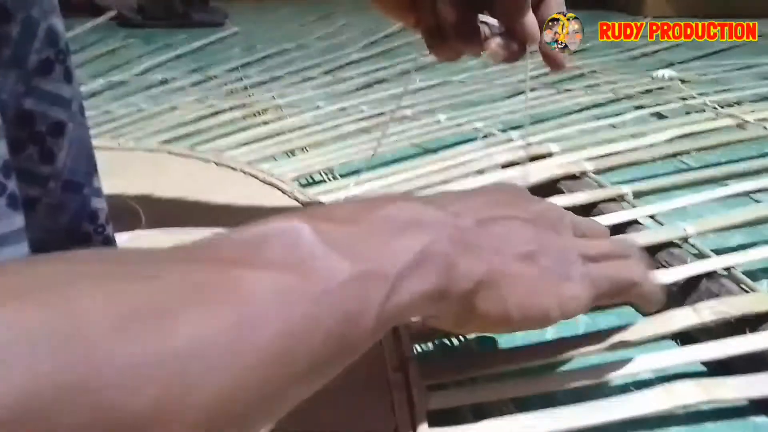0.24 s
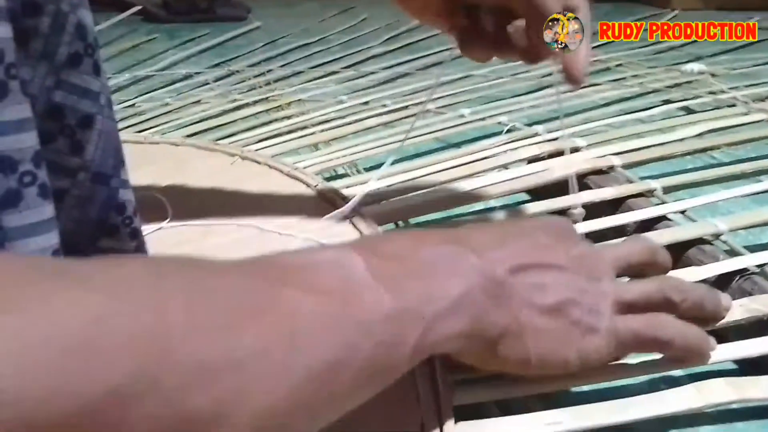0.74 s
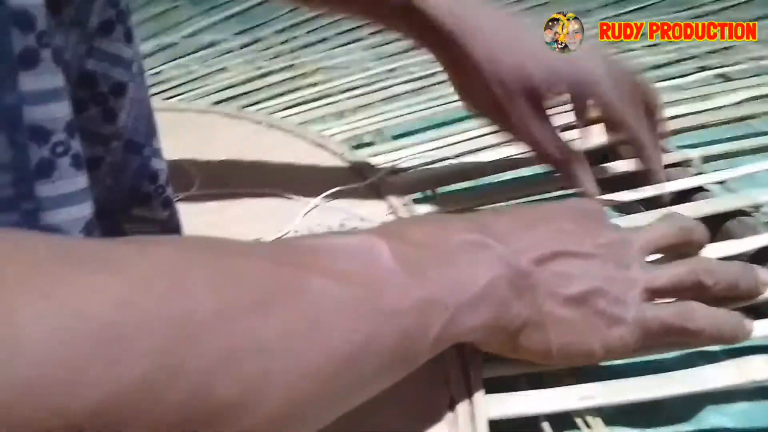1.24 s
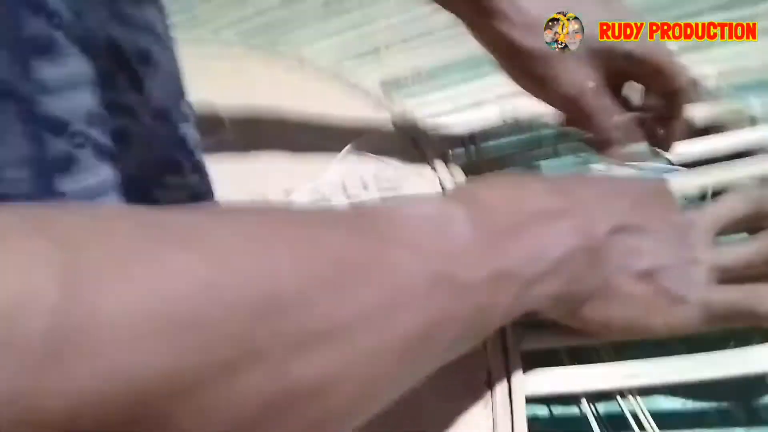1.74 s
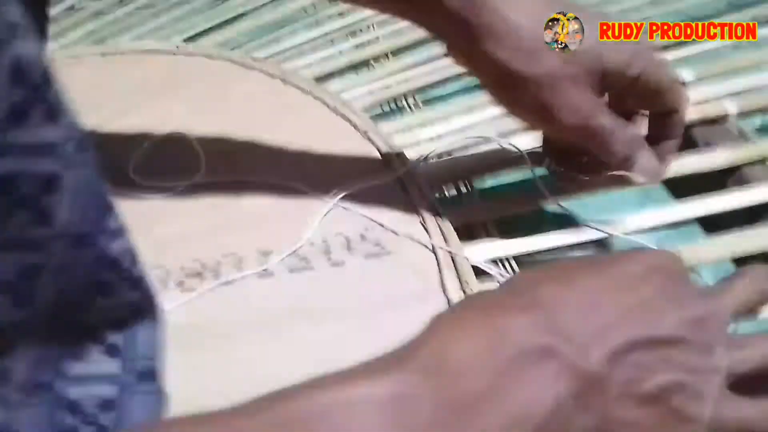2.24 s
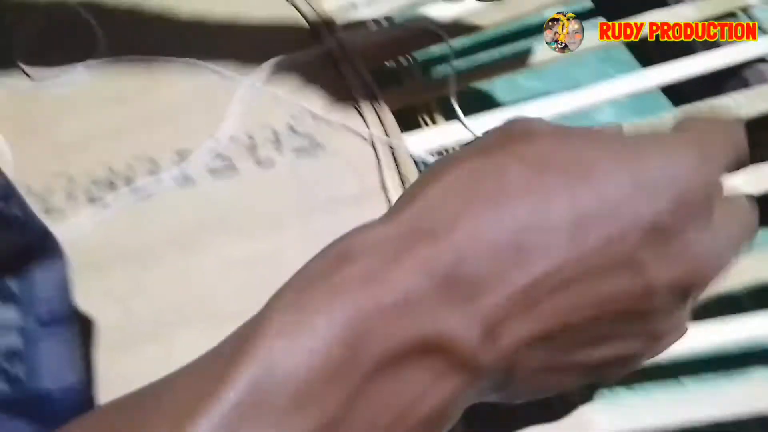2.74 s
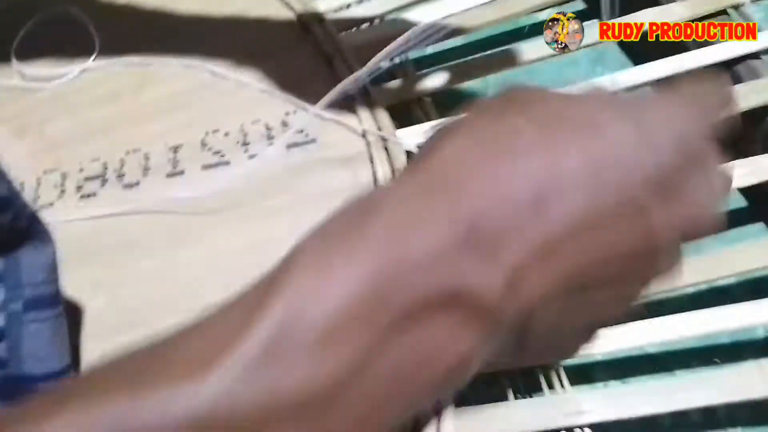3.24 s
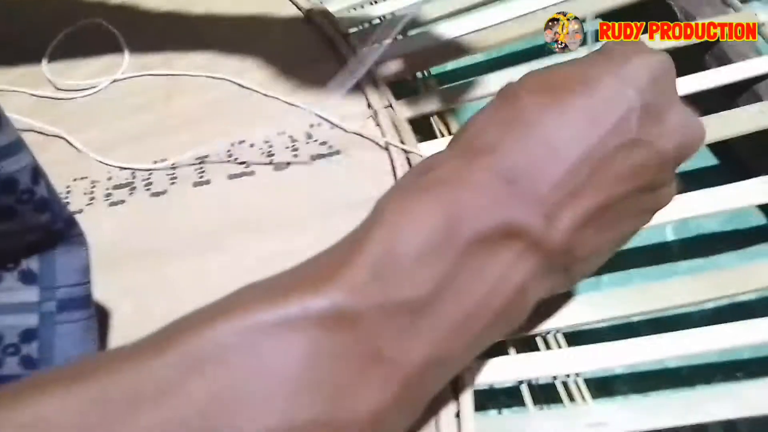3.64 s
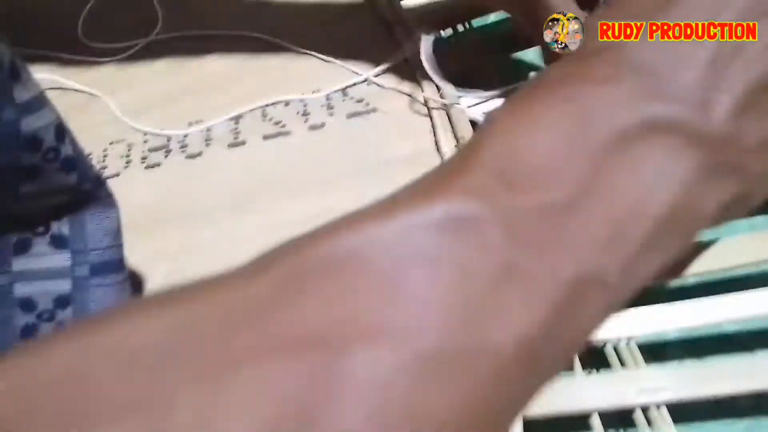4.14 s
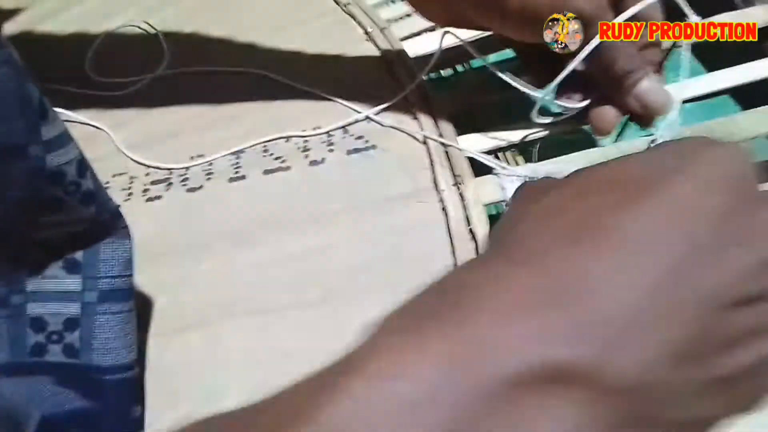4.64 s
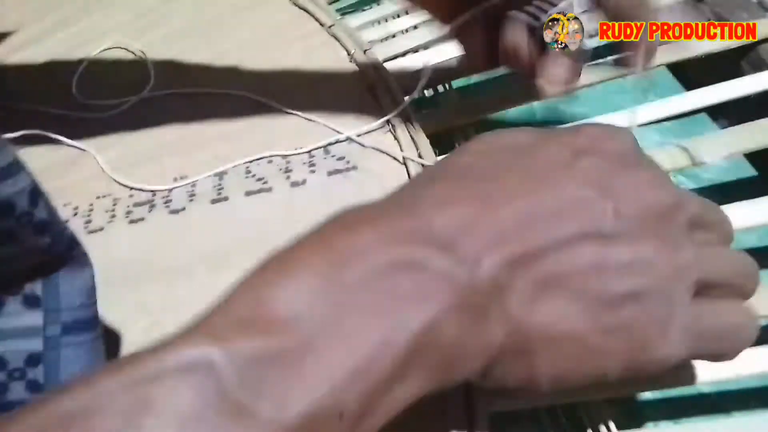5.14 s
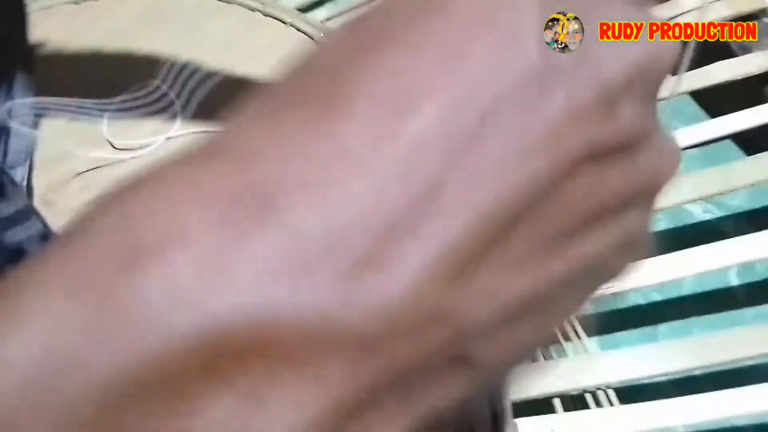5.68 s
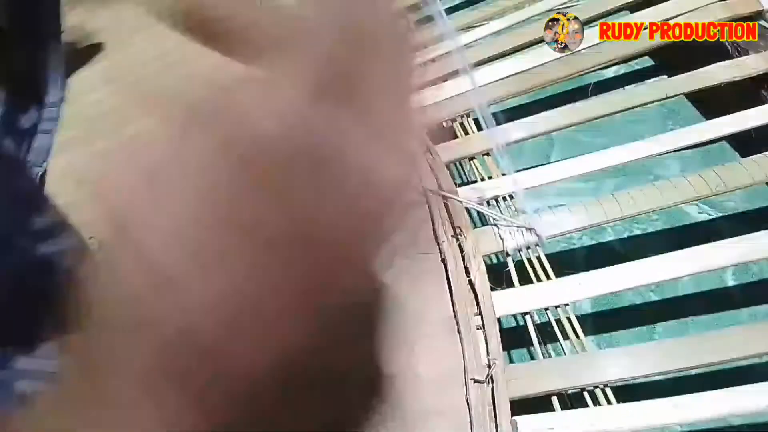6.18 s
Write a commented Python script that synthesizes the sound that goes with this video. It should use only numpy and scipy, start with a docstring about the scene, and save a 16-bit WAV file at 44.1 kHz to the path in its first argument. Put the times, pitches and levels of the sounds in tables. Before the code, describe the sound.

Close-up handling of thin bamboo slats being tied: quiet rubbing first, then a hard clack with rattle, a low string pull, a double knock, and a strong squeaky scrape around three seconds. Irregular woody knocks continue, each shaking the mat, becoming softer and hollower until only faint fibre rustle remains. Dry, small surroundings with short reflections and almost no background noise.

```python
"""First a soft scrape and a rustle are heard, then knocks, as bamboo slats are tied to a wooden frame with string.
Knocked slats ring as sums of decaying modes; scrapes are runs of random slips that excite the same modes.
Jolts set the mat of loose slats shivering: dense random contacts filtered by broad resonances.
String drags and squeaks by stick-slip, the hands rumble on the frame, a small piece of metal pings.
Short reflections follow the slats, over faint air; the level dips briefly three times."""
import sys
import numpy as np
from scipy import signal
from scipy.fft import rfft, irfft
from scipy.io import wavfile
from scipy.ndimage import uniform_filter1d

SR = 44100
rng = np.random.default_rng(int(sys.argv[2]) if len(sys.argv) > 2 else 0)


def unload_audio(sound):
    """Save the sound as a 16-bit wav file, at the path given as the first command line argument."""
    columns = np.transpose(np.atleast_2d(sound))
    # keep every value between -1 and 1, then stretch to whole-number steps
    steps = np.round(np.clip(columns, -1, 1) * 32767)
    wavfile.write(sys.argv[1], SR, steps.astype(np.int16))


N = 282681
T = np.arange(N) / SR  # time [s]

# Slat on slat: (time [s], level before voicing [dB], brightness [dB/octave], hollowness [dB], ring length factor)
KNOCKS = [(0.621, -74, -14, -4, .4), (0.671, -52.5, -3, -10.5, 0.12), (0.808, -67, -2.6, 5.5, 1.1),
          (1.2435, -52, -10, 5, 0.65), (1.3762, -65.5, 3.8, 6, 0.13), (1.4735, -32, -2.5, -17, 1.1),
          (2.164, -39.5, -5, -11, 0.61), (2.4433, -30.5, -6.5, -3.5, 0.77), (2.455, -46, -2.5, 11.5, 1.3),
          (2.5131, -29, -7, 4.5, 0.27), (2.822, -60.5, -18, 6, 0.11), (3.033, -50, -4.5, 1.5, 1.2),
          (3.411, -37, 5, 1.5, .55), (3.4624, -31, -0.5, 7, 0.4), (3.582, -34, -6, -22, 0.95),
          (3.6443, -49, -3, 17, 0.2), (3.932, -48, -10, -1, 1.9), (3.9731, -26, -7, -2.5, 1.04),
          (4.317, -48, -10, -8, 0.66), (4.372, -48.5, -11, 10, 0.96), (4.4932, -42, -18, 15, 0.57),
          (4.544, -26.5, -8, 6.5, 0.79), (4.7953, -45.5, -11, -20, 1.15), (5.019, -48, -9, 8.5, 1.6),
          (5.073, -38.5, -9, 11.5, 1.57), (5.229, -41.5, -16, 17.5, 1.9), (5.285, -44.5, -11.5, 8.5, .6),
          (5.444, -38, -10, 2, 0.74), (5.8755, -81, 3, -8, .3), (6.028, -69, -2.5, 11, 1.36)]
# Slat sliding on slat: (peak time [s], rise constant [s], fall constant [s], level before voicing [dB],
# brightness [dB/octave], hollowness [dB])
SCRAPES = [(0.04, 0.063, 0.048, -40.5, -10, 9.5), (0.11, 0.075, 0.034, -46.5, -15, 10.5),
           (0.63, 0.046, .03, -51, -8.5, -8.5), (2.44, 0.029, 0.033, -39.5, -5, -1),
           (3.05, 0.0018, 0.17, -44.5, -6, 1), (3.128, 0.023, 0.023, -41, -6.5, 10.5),
           (3.166, 0.0027, .029, -25.5, -6.5, 15), (3.22, 0.021, .048, -46, 2, 8.5),
           (4.38, .014, 0.031, -52, -14, 12), (4.765, 0.013, 0.015, -56, -4.5, 18),
           (4.936, 0.018, 0.011, -65.5, -5, 14), (5.235, 0.013, 0.033, -38, -13, 7),
           (5.27, .018, 0.021, -43, -6.5, -4.5), (6.08, .025, 0.049, -68, -0.5, -0.5),
           (6.171, .012, 0.021, -59, -1.5, -5), (6.295, 0.025, 0.011, -58, -2, -2)]
# Modes of a bamboo slat, before scatter and ring factor: (frequency [Hz], relative level [dB], t60 [s])
SLAT_MODES = [(345.6, -21.5, 0.017), (516.4, 4.5, 0.037), (552.9, 13, 0.15), (585.7, 4, 0.03),
              (722.6, 6.5, 0.065), (929, -7, 0.021), (1006.4, 6.5, 0.11), (1100, 21.5, 0.044),
              (1207, 3, 0.053), (1385, -14, 0.01), (1732, 2, 0.073), (1814, 1.5, 0.082), (1980, 8.5, 0.025),
              (2312, 5, 0.041), (2308, -8.5, 0.014), (2580, -4.5, 0.012), (3740, -17, 0.02),
              (4047, 0.5, 0.015), (4160, -1.5, 0.02), (4470, -5, 0.016), (5480, -8.5, 0.022)]
# Registers of a slat, low to high: (lower edge [Hz], upper edge [Hz])
REGISTERS = [(390, 800), (820, 1330), (1600, 2900), (3500, 5300)]
# How a contact shares its strength among the registers, low to high:
# (height above the lowest [octaves], relative level [dB], share of the hollowness)
VOICING = [(0, -1, 0), (.9, -3.5, 1), (1.95, 4.5, 0.92), (2.951, 1, 0.078)]
# The mat shivering after a jolt: (time [s], level before voicing [dB], brightness [dB/octave])
SHIVERS = [(-0.04, -53.5, -4.5), (1.475, -34.5, -2), (2.47, -40, -4), (3.168, -33.5, 1.2),
           (3.43, -36.5, -.5), (3.975, -40, -1.5), (4.546, -41, -2.5), (5.075, -49, -10),
           (5.26, -46, -17.5), (5.444, -52, -22)]
# Colour of the mat against a single slat, one entry for each register, low to high: level [dB]
SHIVER_REGISTER_DB = [1, 1, -1.9, -5.5]
# Broad resonances of the tied mat: (frequency [Hz], width [Hz], level [dB])
BOARD = [(600, 87, 7.5), (740, 62, -7.5), (1140, 160, -9), (1810, 150, 3), (2580, 970, -3.5),
         (4210, 320, 3)]
# String dragged over a slat: (time [s], level of the main resonance [dB], resonance [Hz])
SHORT_DRAG = [(1.0, -74, 740), (1.03, -56.5, 730), (1.08, -52.5, 757), (1.17, -50, 769), (1.22, -53, 770),
              (1.32, -55, 777), (1.45, -64, 804)]
# A longer pull that catches and slips on: (time [s], level of the main resonance [dB], resonance [Hz])
LONG_DRAG = [(1.78, -52.5, 516), (1.936, -50, 560), (2.056, -50.5, 510), (2.162, -53.5, 600),
             (2.174, -39.5, 611), (2.308, -54.5, 620), (2.37, -47, 535), (2.42, -41, 499)]
# Taut string squeaking: (centre time [s], half length [s], frequency [Hz], half width [Hz], level [dB])
SQUEAKS = [(1.191, 0.06, 3370, 110, -69), (1.363, 0.12, 3340, 45.3, -61.5), (2.015, 0.16, 1900, 60, -62),
           (3.179, 0.019, 1878, 226, -16), (5.548, 0.078, 1810, 52, -58.5), (5.572, .12, 4060, 11, -78.5)]
# Hands pressing on the frame: (time [s], rumble level [dB])
HANDS = [(0.1, -60), (.35, -89), (.66, -72.5), (1.18, -74.5), (1.33, -53.5), (1.72, -51.5), (1.93, -70.5),
         (2.15, -60.5), (2.35, -75.5), (2.85, -58.5), (3.13, -49), (3.45, -65.5), (4.42, -59), (5.0, -70),
         (5.25, -80), (5.41, -54), (5.68, -64.5), (5.83, -80)]
# The frame groaning under the palm: (time [s], level [dB])
GROAN = [(1.22, -91), (1.245, -53.5), (1.34, -49), (1.45, -56), (1.50, -37), (1.62, -58), (1.8, -59)]
# String running through the fingers: (time [s], hiss level [dB])
THREAD = [(0, -69), (.42, -89), (.62, -73.5), (1.05, -75.5), (1.3, -67.5), (2.05, -63.5), (2.33, -69),
          (3.2, -78), (3.9, -83.5), (4.35, -75.5), (5.8, -75), (5.95, -69.5), (6.32, -67), (6.41, -87)]
# Colour of that hiss: (frequency [Hz], relative level [dB])
HISS = [(300, 2.5), (1000, 4), (1400, 3.5), (1900, 2), (3200, 0.5), (4600, -1.5), (6200, -4), (9000, -15),
        (15000, -21.5)]
# Modes of a small metal piece, before the tap's own factors: (frequency [Hz], level [dB], t60 [s])
METAL = [(4000, -59, .5), (6430, -46, .25), (6906, -41, .6), (9750, -56, .3), (10412, -45, .38),
         (11390, -58, .12), (13900, -42, .33), (14660, -47, .28)]
# Taps on it: (time [s], relative level [dB], loss in the upper modes [dB/octave], ring length factor)
PINGS = [(1.379, -2, 1, 1), (3.478, -8.5, 37.5, 0.47)]
# Colour of the air: (frequency [Hz], relative level [dB])
AIR = [(25, 5.5), (55, -13), (130, -1), (300, 3.5), (550, -17), (1400, -21.5), (1900, -11), (5000, -28.5),
       (9000, -19), (15000, -20.5)]
# Moments when the level dips: (start [s], end [s])
GAPS = [(.254, .325), (.387, .503), (.847, .993)]

# The contact's tick: level with the top register at 0 dB [dB], growth for each dB of that register
TICK_DB, TICK_GROWTH = -26, 0.8
# A jolt of TYPICAL_DB builds up in BUILD_S and reaches down to REACH_HZ.
# Every DOUBLING_DB more doubles the time and reaches an octave lower; gentle jolts stop at the lowest register.
TYPICAL_DB, DOUBLING_DB = -40.5, 9.5
BUILD_S, REACH_HZ = 0.071, 352
# The upper edge of a shiver rises with brightness (Hz for each dB/octave), but stays above the dull edge.
EDGE_HZ, EDGE_HZ_PER_TILT, DULL_EDGE_HZ = 5020, 280, 4450
AIR_DB, TOP_HZ = -74.5, 15600


def knocks(tick_s=.0014, tick_hz=7400, snap_hz_per_tilt=170):
    """Impact excitation: each blow sets the strength of the slat's registers in the first 20 ms."""
    out, t = np.zeros(N), T[:4000]
    for s, size_db, tilt_db, hollow_db, ring in KNOCKS:
        blow = slat(ring)
        tick = band(rng.standard_normal(len(t)) * np.exp(-t / tick_s), 6200, tick_hz, order=1)
        snap_low, snap_high = REGISTERS[3]
        snap = (snap_low + snap_hz_per_tilt * max(tilt_db, 0), snap_high)  # the brightest blows snap higher
        parts = [band(blow, *edges, order=4) for edges in [*REGISTERS[:3], snap]] + [tick]
        levels = voicing(size_db, tilt_db, hollow_db)
        tick_db = TICK_DB + TICK_GROWTH * levels[-1]
        for part, db in zip(parts, [*levels, tick_db]):
            add(out, s, undb(db) * part / np.std(part[:SR // 50]))
    return out


def slat(ring, scatter=0.013, place_db=5.0, crack_db=9, crack_s=0.0025,
         rattle_db=-7, rattle_s=0.0065, lag_s=0.000688, plain_db=-13):
    """Modal superposition: decaying slat modes, scattered for each blow, with a crack and neighbours' rattle."""
    t = T[:4000]
    length = max(ring, .15)
    hz, db, t60 = np.transpose(SLAT_MODES)[:, :, None]
    hz = hz * (1 + scatter * rng.standard_normal(hz.shape))
    db = db + place_db * rng.standard_normal(hz.shape)  # each mode's share depends on where the slat is hit
    age = np.maximum(t - lag_s * np.sqrt(hz.mean() / hz), 0)  # low bending waves travel more slowly
    modes = np.sum(undb(db - 60 * age / (t60 * length)) * np.sin(2 * np.pi * hz * age), axis=0)
    crack = undb(crack_db) * np.exp(-t / crack_s)
    rattle = undb(rattle_db) * np.exp(-t / (rattle_s * length))
    return modes + board(2 * (crack + rattle) * rng.standard_normal(len(t)), plain_db)


def scrapes(top_hz=13000, grit_db=-14):
    """Stick-slip excitation: a run of slips swells and dies away, ringing the same slat modes."""
    out = np.zeros(N)
    t = T[:26000] - .2
    for s, rise_s, fall_s, size_db, tilt_db, hollow_db in SCRAPES:
        pushes = slips(len(t), per_s=2500, spread_db=3)
        body = signal.fftconvolve(pushes, slat(ring=0.51))[:len(t)]
        grit = band(pushes, 3400, top_hz, order=1)
        parts = [band(body, *edges, order=4) for edges in REGISTERS] + [grit]
        levels = voicing(size_db, tilt_db, hollow_db)
        sound = sum(undb(db) * unit(part) for part, db in zip(parts, [*levels, levels[-1] + grit_db]))
        add(out, s + t[0], sound * np.exp(np.minimum(t / rise_s, -t / fall_s)))
    return out


def voicing(db, tilt_db, hollow_db):
    """Spectral balance: brightness tilts the registers by octaves; far from a binding a contact is hollower."""
    octaves, base_db, share = np.transpose(VOICING)
    return db + base_db + tilt_db * octaves + hollow_db * share


def shivers(t60_s=0.46, low_t60_s=0.76, early=0.11, low_lead=0.25, frame_db=-16, rumble_db=-19,
            plain_db=5, plain_growth=1.8, ripple_db=1.5):
    """Spreading vibration: a jolt crosses the mat, bass first; many light contacts rustle, ring and die away."""
    out, t = np.zeros(N), T[:32000]
    for s, size_db, tilt_db in SHIVERS:
        spread = 2 ** ((size_db - TYPICAL_DB) / DOUBLING_DB)  # a harder jolt moves more of the mat
        build_s, low_hz = BUILD_S * spread, min(REACH_HZ / spread, REGISTERS[0][0])
        top_hz = max(EDGE_HZ + EDGE_HZ_PER_TILT * tilt_db, DULL_EDGE_HZ)
        contacts = slips(len(t), per_s=3000, spread_db=3)
        # gentle jolts ring, hard ones rustle
        wash = board(contacts, plain_db + plain_growth * (size_db - TYPICAL_DB))
        wash = uneven(wash, ripple_db)
        registers = [(low_hz, 780), (800, 1330), (1600, 3200), (3550, top_hz)]
        parts = [unit(band(wash, *edges, order=4)) for edges in registers]
        frame = undb(frame_db) * unit(band(contacts, 190, 320))
        rumble = undb(rumble_db) * unit(band(contacts, 100, 190))
        parts[0] = parts[0] + frame + rumble  # the frame below shakes along
        levels = voicing(size_db, tilt_db, 0) + SHIVER_REGISTER_DB
        for k, (part, db) in enumerate(zip(parts, levels)):
            build, t60 = (build_s * low_lead, low_t60_s) if k == 0 else (build_s, t60_s)
            swell = (early + 1 - np.exp(-(t / build) ** 2)) * undb(-60 * t / t60)
            add(out, s, undb(db) * part * swell / swell.max())
    return out


def board(x, plain_db):
    """Resonant radiation: broad resonances of the mat in parallel with an uncoloured part."""
    out = undb(plain_db) * x
    for hz, width_hz, db in BOARD:
        out = out + undb(db) * signal.lfilter(*signal.iirpeak(hz, hz / width_hz, fs=SR), x)
    return out


def uneven(x, ripple_db):
    """Modal irregularity: slats of many lengths leave narrow random peaks and dips in the spectrum."""
    hz = np.arange(700, 6000, 130)
    db = ripple_db * rng.standard_normal(len(hz))
    db[0] = 0
    return colour(x, np.column_stack([hz, db]))


def drag(rows, width_hz, overtone_db, overtone_hz):
    """Stick-slip of string on a slat: one main resonance moves with the pull, beside a weak higher mode."""
    pushes = slips(N, per_s=5000, spread_db=2)
    ring = signal.sosfilt(signal.butter(5, width_hz / 2, fs=SR, output="sos"), pushes)
    carrier = np.cos(2 * np.pi * np.cumsum(curve(rows, 2)) / SR)  # lifts the ring to the moving resonance
    main = unit(ring * carrier)
    upper = unit(band(pushes, overtone_hz - width_hz / 2, overtone_hz + width_hz / 2, order=2))
    return (main + undb(overtone_db) * upper) * undb(curve(rows, 1)) * during(rows)


def squeak():
    """Narrow-band friction tone: taut string slips and gives thin squeaks of unsteady strength and phase."""
    out = np.zeros(N)
    t = T[:35280] - .4
    for s, length_s, hz, width_hz, db in SQUEAKS:
        sine = waver(len(t), width_hz) * np.sin(2 * np.pi * hz * t)
        cosine = waver(len(t), width_hz) * np.cos(2 * np.pi * hz * t)
        add(out, s + t[0], undb(db) * unit(sine + cosine) * np.exp(-(t / length_s) ** 2))
    return out


def hands(high_hz=195):
    """Low-frequency friction: small slips of the hands make the frame rumble and groan."""
    grip, palm = (slips(N, per_s=6000, spread_db=4) for _ in range(2))
    rumble = unit(band(grip, 96, high_hz, order=4)) * undb(curve(HANDS, 1))
    groan = unit(band(palm, 171, 330, order=5)) * undb(curve(GROAN, 1)) * during(GROAN)
    return rumble + groan


def thread():
    """Broadband friction: string fibres slipping through the fingers make a coloured hiss."""
    fibres = slips(N, per_s=4000, spread_db=5)
    return unit(colour(fibres, HISS)) * undb(curve(THREAD, 1))


def pings():
    """Free modal decay: loosely held metal is tapped; a soft tap leaves its upper modes quiet."""
    out, t = np.zeros(N), T[:40000]
    for s, size_db, loss_db, ring in PINGS:
        for hz, db, t60 in METAL:
            dull_db = loss_db * max(np.log2(hz / METAL[2][0]), 0)  # loss above the third mode
            chatter = .7 + .7 * waver(len(t), 110)
            decay = undb(size_db + db - dull_db - 60 * t / (t60 * ring))
            add(out, s, chatter * decay * np.sin(2 * np.pi * hz * t))
    return out


def room(x, wet_db=-11, t60_s=0.44, top_hz=4600):
    """Reverberation by convolution: short, dull reflections from the floor and nearby walls."""
    t = T[:22050]
    noise = band(rng.standard_normal(len(t)), 250, top_hz, order=4)
    tail = noise * undb(-60 * t / t60_s) * (t > .006)
    return undb(wet_db) * signal.fftconvolve(x, tail / np.linalg.norm(tail))[:N]


def still_air():
    """Stationary noise: a steady random background with the colour of the air."""
    return unit(colour(rng.standard_normal(N), AIR)) * undb(AIR_DB)


def slips(n, per_s, spread_db):
    """Stick-slip as a random pulse train: tiny pushes of random time, sign and size."""
    happens = rng.random(n) < per_s / SR
    return happens * rng.choice([-1, 1], n) * undb(spread_db * rng.standard_normal(n))


def waver(n, width_hz):
    """Narrow-band modulation: a slow random swing with rms 1 makes a tone a narrow, unsteady line."""
    return unit(signal.sosfilt(signal.butter(3, width_hz, fs=SR, output="sos"), rng.standard_normal(n)))


def undb(db):
    """Logarithmic level: decibels to amplitude gain."""
    return np.exp(np.asarray(db) * np.log(10) / 20)


def unit(x):
    """Power normalisation: scale to rms 1."""
    return x / np.sqrt(np.mean(x ** 2))


def band(x, lo_hz, hi_hz, order=3):
    """Band limitation: causal Butterworth band-pass."""
    return signal.sosfilt(signal.butter(order, [lo_hz, hi_hz], "band", fs=SR, output="sos"), x)


def colour(x, points):
    """Spectral shaping: weight the spectrum by (frequency [Hz], level [dB]) points."""
    hz, db = np.transpose(points)
    f = np.maximum(np.arange(len(x) // 2 + 1) * SR / len(x), 1)
    return irfft(rfft(x) * undb(np.interp(np.log(f), np.log(hz), db)), len(x))


def curve(rows, column):
    """Linear interpolation: one column of a table as a line through time."""
    rows = np.array(rows)
    return np.interp(T, rows[:, 0], rows[:, column])


def during(rows):
    """Time windowing: a soft-edged window over the time that a table covers."""
    inside = (T >= rows[0][0]) & (T <= rows[-1][0])
    return uniform_filter1d(inside * 1., size=900)


def add(out, s, x):
    """Superposition: mix x into out from time s [s] on."""
    i = int(round(s * SR))
    x, i = x[max(-i, 0):], max(i, 0)
    out[i:i + len(x)] += x[:N - i]


def scene():
    """Superposition of slats with their reflections, string, hands, metal and still air."""
    slats = knocks() + scrapes()
    string = drag(SHORT_DRAG, width_hz=384, overtone_db=-21.0, overtone_hz=1900)
    string += drag(LONG_DRAG, width_hz=268, overtone_db=-18.5, overtone_hz=1810)
    string += thread() + squeak()
    return (slats + room(slats) + shivers() + string + hands() + pings() + still_air())[None]


def record(dry, gap_db=-45):
    """Gain and low-pass filtering: the level dips briefly three times; the top is cut off."""
    gain = np.ones(N)
    for start, end in GAPS:
        gain[(T > start) & (T < end)] = undb(gap_db)
    low_pass = signal.ellip(10, .2, 70, TOP_HZ, fs=SR, output="sos")
    return signal.sosfilt(low_pass, dry * uniform_filter1d(gain, size=200))


dry = scene()
out = record(dry)
unload_audio(out)
```